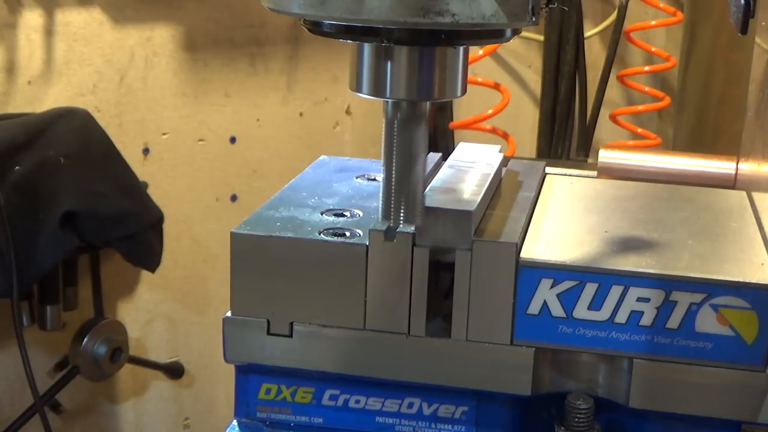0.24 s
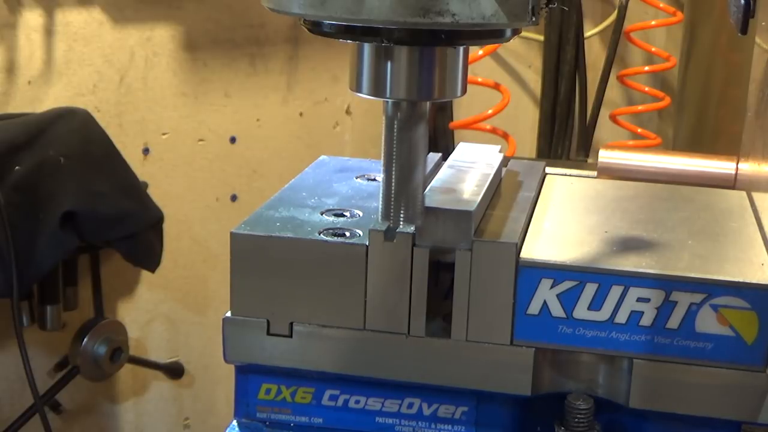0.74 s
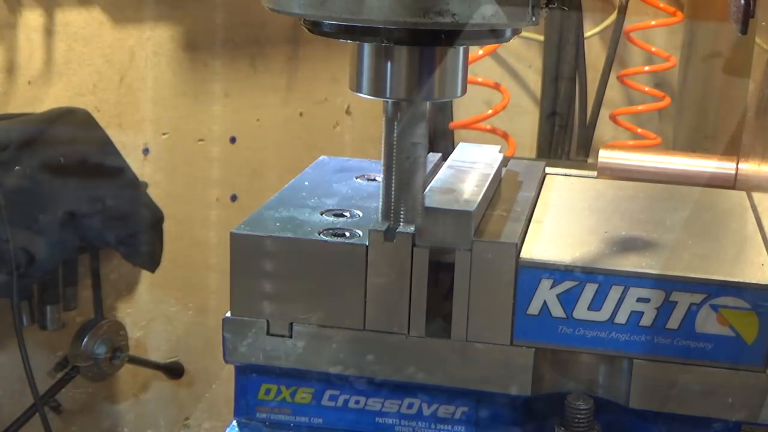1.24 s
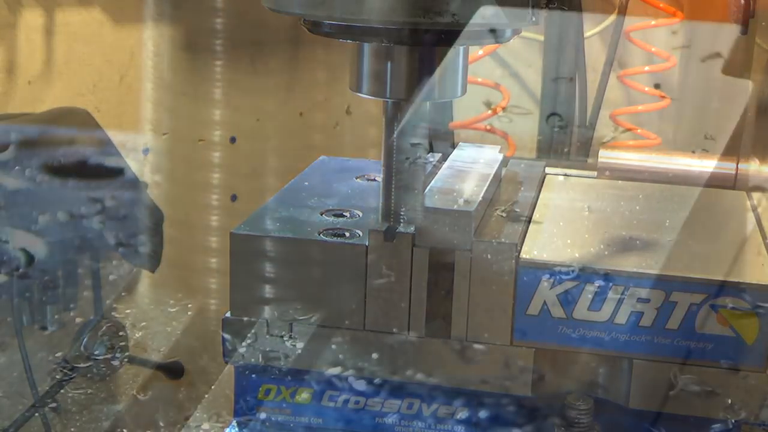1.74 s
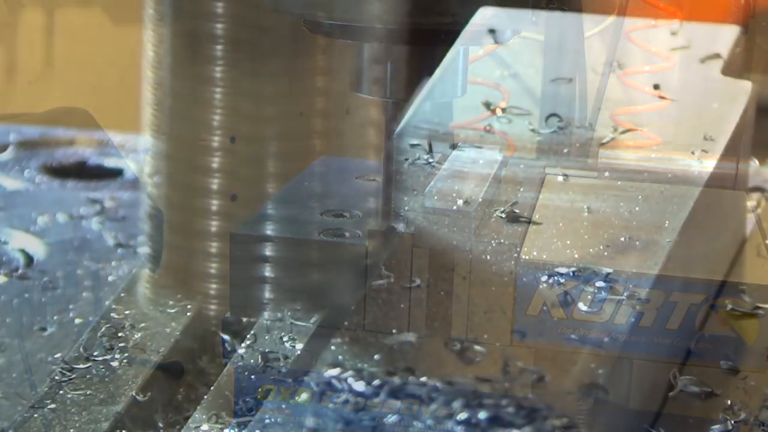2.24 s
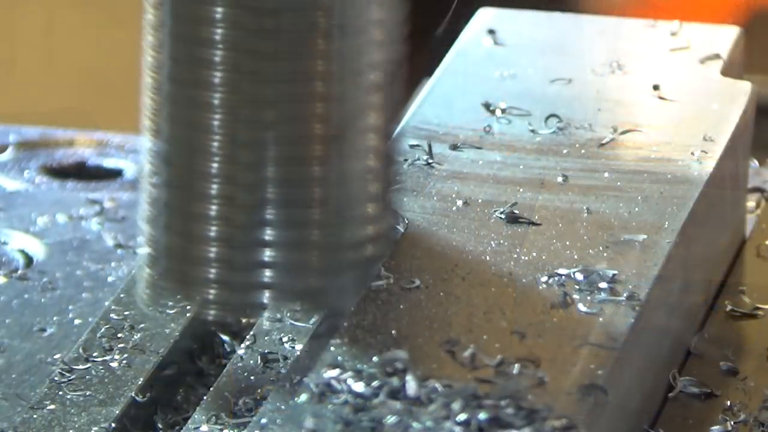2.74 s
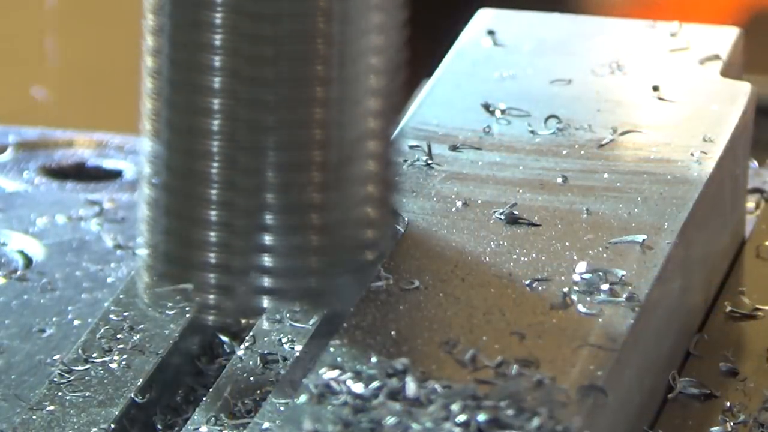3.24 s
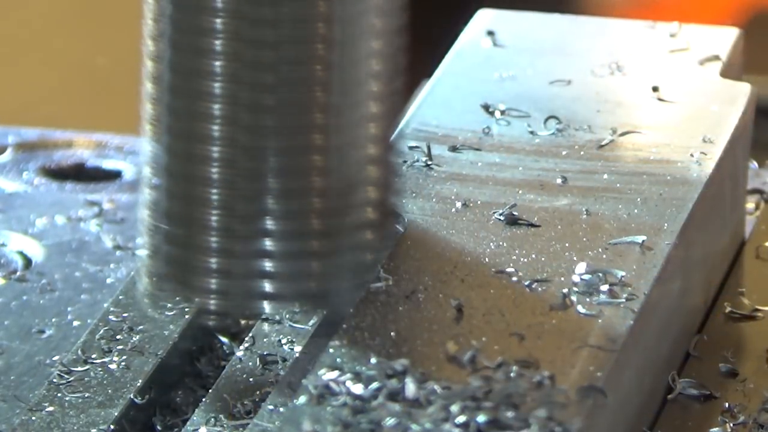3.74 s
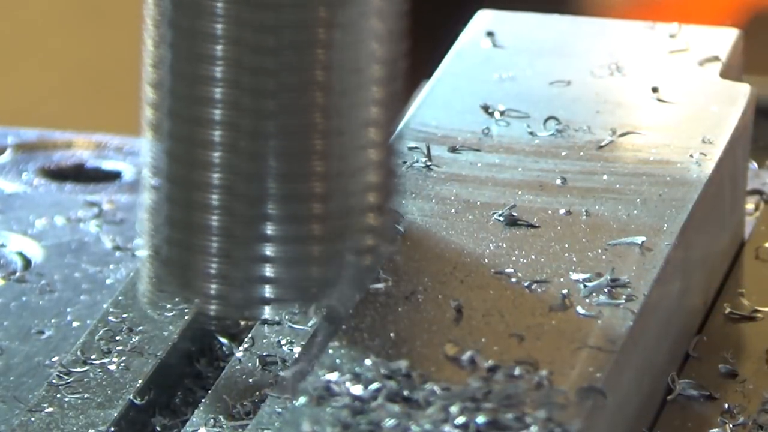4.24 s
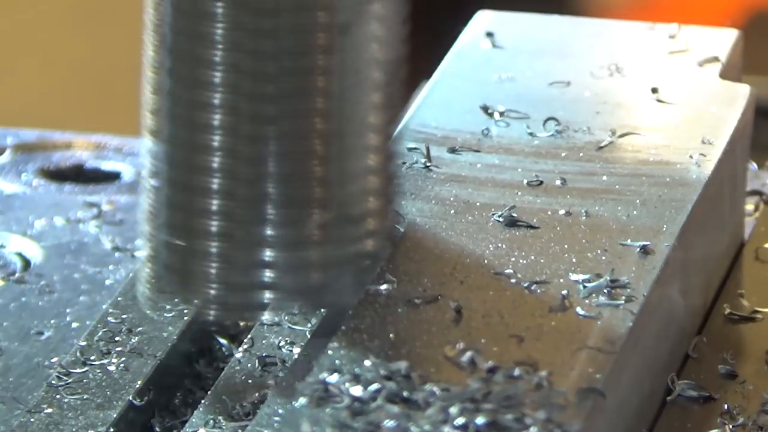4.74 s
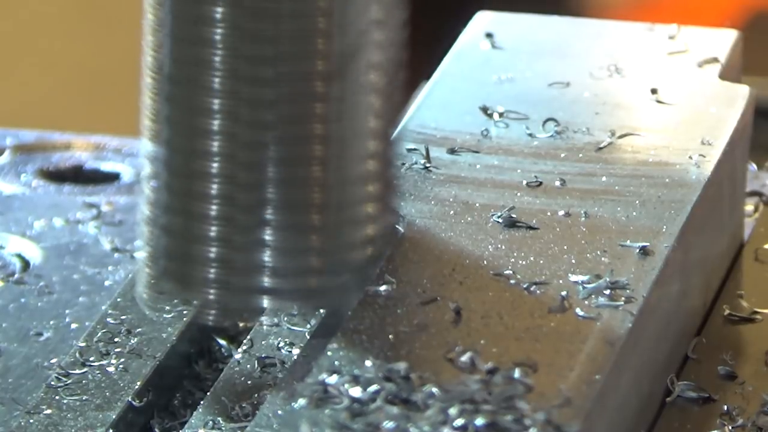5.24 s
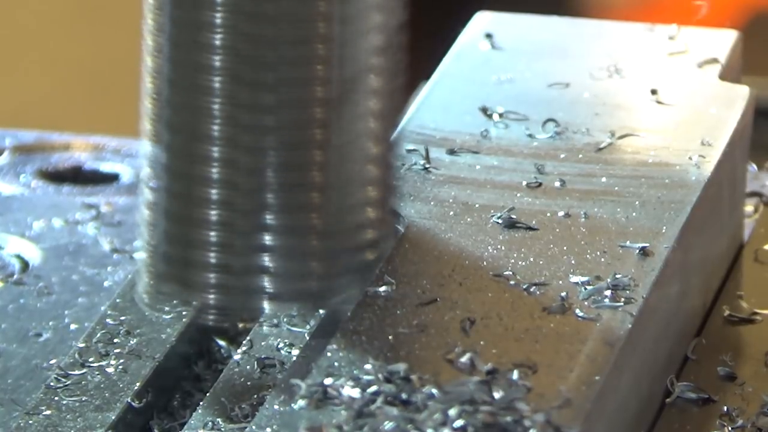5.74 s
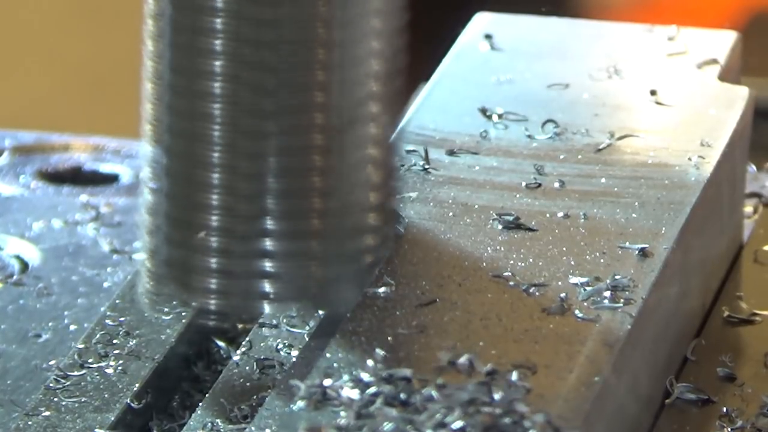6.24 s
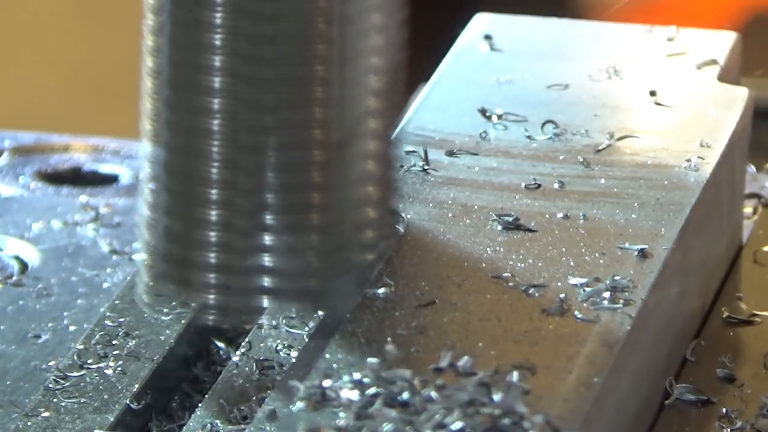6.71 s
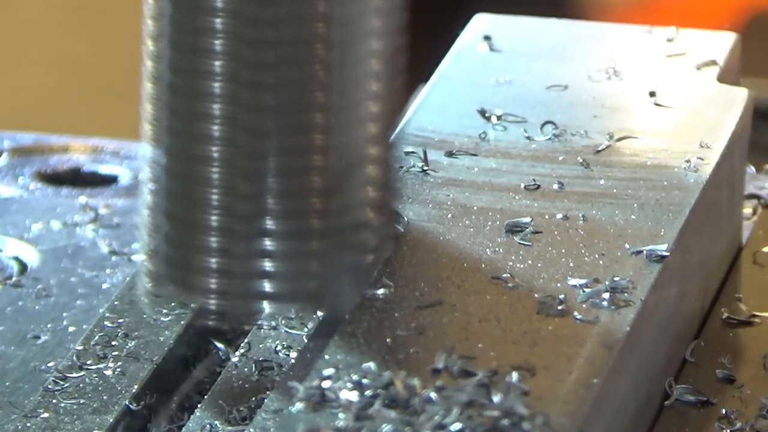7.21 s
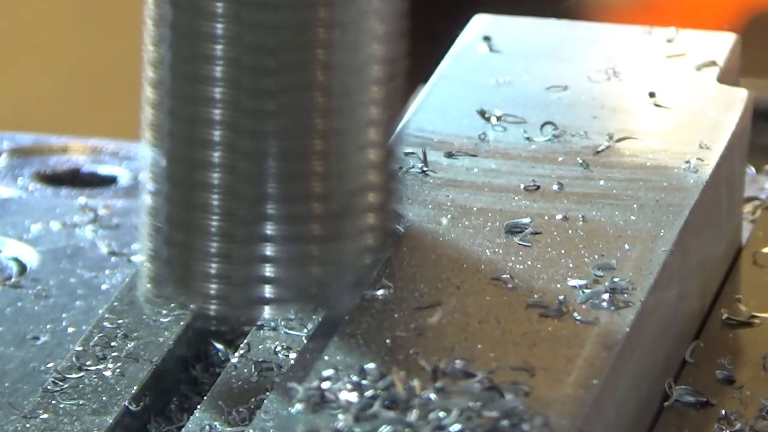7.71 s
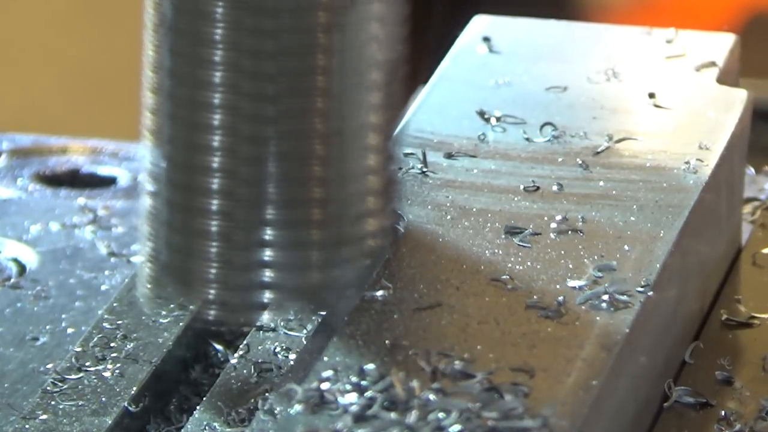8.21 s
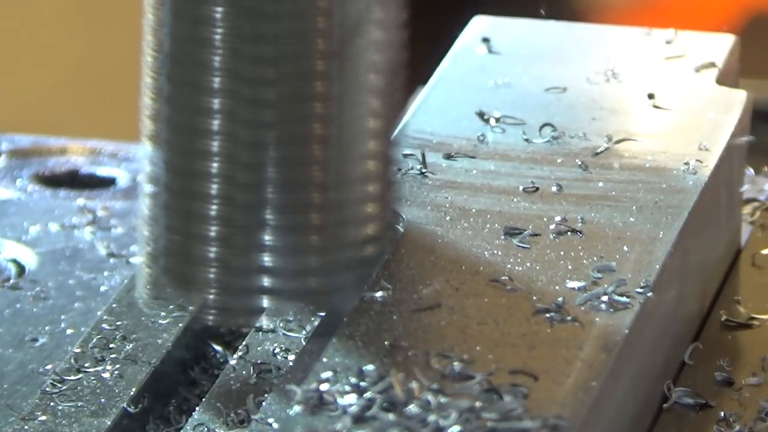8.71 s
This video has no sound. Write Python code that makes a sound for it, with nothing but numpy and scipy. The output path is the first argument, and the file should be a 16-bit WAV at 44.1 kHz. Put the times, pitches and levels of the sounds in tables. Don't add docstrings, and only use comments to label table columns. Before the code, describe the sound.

From 0 s a milling machine is already running close by in a workshop, its spindle making a loud, nasal gear whine around 1 kHz, with slow beats that swell and dip a little over once a second. Beneath are motor hum, belt tones and broad rumble; the cutter only skims the steel, giving a thin, uneven scratchy flutter. From about 0.9 to 1.8 s it sinks in: metallic ringing around 3 to 5 kHz grows fuller and the rumble rises. By 2.6 s the cut is at full depth. The whine becomes weaker and steadier, surrounded by denser gear buzz. Until 9 s the roar continues without pause, nearly sixty bites a second, alternating stronger and weaker about fourteen times a second. Crisp chip hiss rides on top, with a thin squeal near 13 kHz that grows early, then gently swells every couple of seconds. Wide stereo, dry and close.

```python
import sys
import numpy as np
from scipy import signal
from scipy.fft import rfft, irfft, next_fast_len
from scipy.io import wavfile
from scipy.ndimage import uniform_filter1d, map_coordinates

SR = 44100
rng = np.random.default_rng(int(sys.argv[2]) if len(sys.argv) > 2 else 0)


def attenuation_scalar(level_db):
    decades = np.asarray(level_db, float) / 20
    return 10 ** decades


def bounce(signal):
    frames = np.transpose(np.atleast_2d(signal))
    limited = np.clip(frames, -1, 1)
    pcm = np.round(limited * 32767).astype(np.int16)
    wavfile.write(sys.argv[1], SR, pcm)


N = 395577
SPINDLE_HZ = 14.415

# time_s, depth [share of the deep cut, 0 light - 1 deep], #
FEED = [
    (0, 0.1, 0.17, 0.19),
    (.9, 0.07, 0.2, 0.18),
    (1.3, 0.53, 0.13, 0.24),
    (1.8, 0.87, 0.094, 0.22),
    (2.6, 0.99, 0.094, 0.237),
    (9, 0.99, 0.13, 0.23),
]


def feed(t):
    time_s, *columns = np.transpose(FEED)
    return [np.interp(t, time_s, column) for column in columns]


# order [multiple], shallow_db [rms],
# deep_db [rms]
STRONG_ORDERS = [(3, -62.6, -52.9), (4, -48.8, -51.6), (6, -55.6, -53.7), (7, -48.7, -70.0),
                 (8, -31.4, -32.9), (9, -33.7, -36.3), (12, -37.4, -56.8), (14, -46.1, -46.1),
                 (16, -48.7, -44.0), (19, -54.2, -44.9), (21, -50.0, -45.2), (22, -53.0, -42.6),
                 (23, -38.0, -37.5), (24, -43.0, -38.9), (25, -46.9, -47.1), (27, -47.7, -43.7),
                 (29, -44.5, -51.3), (35, -41.3, -38.5), (36, -50.0, -40.1), (37, -40.4, -42.6),
                 (38, -52.1, -46.1), (40, -70.0, -44.8), (41, -44.0, -38.1), (42, -70.0, -45.9),
                 (44, -70.0, -45.6), (45, -39.6, -42.3),
                 (46, -41.9, -40.1), (47, -45.5, -38.8), (48, -42.7, -35.1), (49, -37.1, -32.8),
               (50, -44.6, -39.2), (51, -41.2, -36.8), (52, -45.9, -36.2), (54, -51.1, -38.0),
               (55, -43.5, -36.6), (57, -35.1, -32.8), (58, -45.1, -40.0), (59, -42.8, -35.5),
               (60, -45.4, -37.6), (61, -38.5, -33.6), (65, -35.9, -41.2), (66, -32.8, -35.9),
               (68, -34.5, -36.3), (69, -20.9, -25.2), (70, -34.1, -34.4), (71, -34.0, -39.7),
               (72, -27.7, -34.2), (73, -24.2, -26.9), (74, -25.2, -34.3), (75, -37.9, -46.3),
               (76, -32.9, -37.2), (78, -31.1, -34.7), (80, -32.2, -33.0), (81, -29.8, -34.6),
               (83, -35.3, -37.9), (84, -35.0, -33.0),
                 (89, -46.6, -41.1), (90, -41.1, -44.6), (92, -47.0, -42.1), (96, -42.9, -43.1),
               (98, -49.1, -43.0), (99, -42.4, -38.0), (100, -51.7, -37.3), (103, -43.8, -37.1),
               (108, -62.1, -43.4), (109, -42.0, -50.8), (119, -44.7, -42.7), (120, -40.3, -39.7),
               (123, -42.4, -48.6), (132, -48.6, -47.9), (133, -48.5, -48.0), (135, -49.7, -47.5),
               (136, -44.0, -53.6), (137, -47.6, -49.0), (140, -47.4, -49.7), (144, -50.9, -47.6),
               (145, -47.7, -56.5), (146, -45.2, -44.9), (147, -44.1, -46.8), (148, -44.2, -49.4)]
# freq_hz, level_db [rms]
WEAK_ORDERS = [(20, -68), (60, -58), (300, -57.5), (450, -58.5), (700, -42), (830, -46), (910, -44),
               (1000, -47), (1200, -38.5), (1350, -48), (1700, -45.5), (2200, -53.5), (2700, -66.5),
               (3000, -82.5)]
WHINE_ORDERS = [69, 73, 74]


def spindle(t):
    size = 8192
    knots = np.arange(0, N / SR + .5, .125)
    order = np.arange(size // 2 + 1)
    hz = order * SPINDLE_HZ
    ends_db = along(WEAK_ORDERS, hz) + 3 * rng.standard_normal((2, len(order)))
    strong = np.transpose(STRONG_ORDERS)
    ends_db[:, np.int_(strong[0])] = strong[1:]
    depth = feed(knots)[0][:, None]
    strength = attenuation_scalar((1 - depth) * ends_db[0] + depth * ends_db[1]) + 0j
    strength[:, WHINE_ORDERS] = attenuation_scalar(0.47) * whine(knots)

    loose = .22 * np.clip(hz / 600, .1, 2) * ~np.isin(order, WHINE_ORDERS) + 0.038
    chance = rng.standard_normal((2, len(knots), len(order)))
    chance = uniform_filter1d(chance, size=2, axis=1) * np.sqrt(2)
    drift = (1 + loose * (chance[0] + 1j * chance[1])) / np.sqrt(1 + 2 * loose ** 2)
    orders = strength * np.exp(2j * np.pi * rng.random(len(order))) * drift

    lean = along(LEAN, hz) / 2 + 1.8 * (hz > 200) * rng.standard_normal(len(order))
    lead = 0.16 + .6 * np.clip(hz / 1000, 0, 1) * rng.standard_normal(len(order)) / 2
    lean[WHINE_ORDERS] = 3.4, 2.6, 1.2
    lead[WHINE_ORDERS] = -.08, -.15, .15
    left = attenuation_scalar(lean) * np.exp(1j * lead)
    right = attenuation_scalar(-lean) * np.exp(-1j * lead)
    both = np.abs(left + right) / 2

    place = [t / knots[1], (t * SPINDLE_HZ % 1) * size]
    turns = [irfft(orders * side / both, size) * size / np.sqrt(2) for side in (left, right)]
    return np.array([map_coordinates(turn, place, order=1, mode="nearest") for turn in turns])


# level_db [rms], neighbour_db [rms], beat_hz, first_null_s
LIGHT_BEAT = [(-22.5, -26, 0.74, 0.29), (-26.5, -28.5, 0.88, .01), (-25, -35, 0.92, .01)]
# load_start_s, level_db [rms], neighbour_db [rms], null_s
LOADED_BEAT = [(2.76, -25.5, -34.5, 3.46), (2.37, -28, -36, 2.78), (1.2, -38, -45, 3.37)]


def whine(t):
    loaded_beat_hz, settle_s = 0.724, 0.87
    t = t[:, None]
    light_db, near_db, beat_hz, null_s = np.transpose(LIGHT_BEAT)
    start_s, loaded_db, weak_db, later_s = np.transpose(LOADED_BEAT)
    load = np.clip((t - start_s) / settle_s, 0, 1)
    light = attenuation_scalar(light_db) - attenuation_scalar(near_db) * np.exp(2j * np.pi * beat_hz * (t - null_s))
    loaded = attenuation_scalar(loaded_db) - attenuation_scalar(weak_db) * np.exp(2j * np.pi * loaded_beat_hz * (t - later_s))
    return (1 - load) * light + load * loaded


# shallow_db, deep_db, squeal_shallow_db, squeal_deep_db
FLUTES = [(1.5, 1.5, 7, -1), (1, 4, 0, -2), (-1, 1.5, 3, -5), (-4.5, -6.5, -5, -8)]


def contact(t):
    edge = .015
    depth, start, arc = feed(t)
    passes = 4 * (t * SPINDLE_HZ - start + 1)
    flute = np.int_(passes)
    angle = (passes - flute) / 4
    load = np.transpose(FLUTES)[:, flute % 4]
    chance_db = .7 * rng.standard_normal((2, N // 256))[:, flute]
    gain = attenuation_scalar(load[::2] + depth * (load[1::2] - load[::2]) + chance_db)
    thinning = np.clip((arc - angle) / (edge + 0.11 * (1 - depth)), 0, 1)
    shear = np.clip(angle / edge, 0, 1) * thinning
    shear = np.maximum(shear, 0.81 * depth)
    bite = np.exp(-((angle - .028) / .013) ** 2)
    snap = depth * np.exp(-((angle - arc + 0.025) / 0.023) ** 2)
    return gain[:, None] * [shear, bite, snap]


def cut(t, force):
    depth = feed(t)[0]
    loose = .2 + .16 * depth
    shear_db = -34.5 + 0.73 * depth
    chips = attenuation_scalar(2.5) * shear_hiss(depth, force[0], loose) + ringing_steel(depth, force[0], loose)
    return attenuation_scalar(shear_db) * chips + squeal(t, depth, force[1])


# freq_hz, level_db
CHIP = [(800, -58), (2000, -19), (3000, -20), (4500, -15.5), (7000, -21), (9000, -19), (11300, -23),
        (11700, -27.5), (13000, -27), (14000, -32), (14900, -35), (15300, -55), (16000, -70)]


def shear_hiss(depth, force, loose):
    shear, bite, snap = force
    drive = shear + (.9 - 1.2 * depth) * bite + 0.86 * snap + loose
    return unit(spread(drive * grit(900, spiky_db=1.5), lambda hz: attenuation_scalar(along(CHIP, hz))))


# freq_hz, width_hz, level_db
STEEL = [(2610, 70, -17), (3337, 134, -7.5), (3890, 150, -7), (4146, 74, 4), (4340, 170, -2.5),
         (4500, 29, 2.5), (4770, 56, -4.5), (5080, 210, -7), (5430, 89, -7), (5820, 120, -16),
         (6560, 470, -24), (8320, 580, -15.5), (10400, 140, -27)]
# freq_hz, width_hz, level_db
CORNER = [(3210, 160, -2), (4140, 330, -1), (4660, 190, -0.5), (5050, 220, -6), (8700, 1100, -13.5)]


def ringing_steel(depth, force, loose):
    shear, bite, snap = force
    blows = .45 * shear + .7 * bite + 1.3 * snap + .8 * loose
    steel = unit(spread(blows * grit(500, spiky_db=1.9), modes(STEEL)))
    light_blows = (1 - depth) * (blows + 0.22 * shear)
    corner = unit(spread(light_blows * grit(500, spiky_db=0.0), modes(CORNER)))
    return attenuation_scalar(4.5) * (.5 + .5 * depth) * steel + attenuation_scalar(-6) * (1 - depth) * corner


# freq_hz, width_hz, level_db
SQUEAL = [(13390, 240, 0), (13800, 350, -10)]


def squeal(t, depth, force):
    heat_s, surge_s, surge_peak_s = 2.3, 2.3, 2.8
    rub, catch, release = force
    heat = np.clip(t / heat_s, 0, 1)
    surge = np.cos(2 * np.pi * (t - surge_peak_s) / surge_s)
    level_db = -44 + 5.6 * heat + 0.8 * depth * surge
    drive = rub + .5 * catch + .6 * release + 0.092
    tone = spread(drive * grit(250, spiky_db=1.5), lambda hz: modes(SQUEAL)(hz) ** 2)
    return attenuation_scalar(level_db) * unit(tone)


def grit(rate, spiky_db):
    size = attenuation_scalar(spiky_db * wobble(rate))
    return size * rng.standard_normal((2, N))


# freq_hz, level_db [rms]
MOTOR = [(91.7, -62), (148.3, -41.5), (178.8, -41), (239.9, -36), (268.1, -43), (536.0, -40), (599.9, -47),
         (741.8, -33), (2039.2, -46.5), (2239.5, -66), (2383.2, -44), (2530.1, -53.8)]


def motor(t):
    idle_db = 3 * (1 - feed(t)[0])
    tones = np.zeros(N)
    for hz, db in MOTOR:
        level_db = db - idle_db * (hz > 400) + 2.5 * wobble(2.96)
        phase = 2 * np.pi * (hz * t + rng.random()) + 0.17 * wobble(2.06)
        tones += attenuation_scalar(level_db) * np.sin(phase)
    return np.sqrt(2) * filtered(tones, sides)


# freq_hz, level_db [per Hz]
DRONE = [(15, -72), (28, -68.5), (100, -55.5), (200, -57.5), (330, -51.5), (450, -63.5), (560, -56),
         (700, -47), (830, -54), (930, -49.5), (1200, -47.5), (1440, -56), (2000, -60), (2800, -66),
         (6000, -75), (15000, -109)]
# freq_hz, width_hz, level_db
CASTING = [(1452, 27, -1.5), (1720, 28, -3.5), (2108, 33, -8), (2407, 140, -19.5)]


def drone(t, force):
    depth = feed(t)[0]
    shear, bite, snap = force[0]
    rumble = (1 + 0.17 * shear) * rng.standard_normal((2, N))
    body = spread(rumble, lambda hz: attenuation_scalar(along(DRONE, hz)))
    ring = spread((0.4 + 1.3 * shear + .5 * snap) * grit(200, spiky_db=4.0), modes(CASTING))
    swell = attenuation_scalar(-4 * (1 - depth) + 0.19 * wobble(1.72) + 1.0 * wobble(9))
    return swell * (attenuation_scalar(-19.5) * unit(body) + attenuation_scalar(-29.5) * unit(ring))


# freq_hz, width_hz, depth [0-1]
NOTCHES = [(615, 20, .4), (915, 70, .6), (1355, 40, .5), (1985, 40, .45), (2190, 80, .45), (2270, 30, .4),
           (2340, 30, .4), (2450, 40, .4), (2980, 200, .4), (3510, 50, .35), (4385, 50, .7),
           (4715, 50, .55), (4890, 100, .45), (5660, 120, .3), (6330, 250, .4), (6900, 150, .3),
           (7830, 100, .3), (9350, 70, .3)]


def reflections(hz):
    return np.prod([1 - d * w * w / (w * w + 4 * (hz - c) ** 2) for c, w, d in NOTCHES], axis=0)


# freq_hz, level_db
LEAN = [(60, 1.0), (110, 0.5), (200, 0.0), (380, 2.0), (690, 4.0), (1280, 4.5), (2350, 2.5), (4330, 1.0),
        (7980, 0.0), (14700, 0.0)]


def sides(hz):
    return attenuation_scalar(along(LEAN, hz) * [[.5], [-.5]])


# freq_hz, coherence [0-1]
ALIKE = [(60, 1), (130, 0.75), (290, 0.22), (630, 0.56), (1390, 0.52), (3050, 0.88), (6700, 0.91),
         (14700, 1)]


def spread(pair, response):
    m = next_fast_len(N + SR // 4)
    hz = np.fft.rfftfreq(m, 1 / SR)
    turn = np.arccos(np.clip(along(ALIKE, hz), 0, 1)) / 2
    mid, side = rfft(pair, m) * response(hz) * [np.cos(turn), np.sin(turn)]
    return irfft([mid + side, mid - side] * sides(hz), m)[:, :N]


def modes(rows):
    def response(hz):
        total = 0
        for k, (c, w, db) in enumerate(rows):
            total = total + (-1) ** k * attenuation_scalar(db) * 1j * hz * w / (c * c - hz * hz + 1j * hz * w)
        return total
    return response


def filtered(x, response):
    m = next_fast_len(N + SR // 2)
    return irfft(rfft(x, m) * response(np.fft.rfftfreq(m, 1 / SR)), m)[..., :N]


def wobble(rate):
    coarse = np.arange(0, N + 16, 16)
    knots = rng.standard_normal(int(N * rate / SR) + 4)
    return np.interp(np.arange(N), coarse, map_coordinates(knots, [coarse * rate / SR]))


def along(points, hz):
    f, v = np.transpose(points)
    return np.interp(np.log(hz + 1), np.log(f + 1), v)


def unit(x):
    return x / np.sqrt(np.mean(x ** 2) + 1e-20)


def scene():
    t = np.arange(N) / SR
    force = contact(t)
    return spindle(t) + motor(t) + filtered(cut(t, force) + drone(t, force), reflections)


def low_pass(x):
    return signal.sosfilt(signal.butter(12, 15310, fs=SR, output="sos"), x)


def record(dry):
    ceiling, knee = 0.97, 7
    held = dry / (1 + np.abs(dry / ceiling) ** knee) ** (1 / knee)
    return low_pass(held)


dry = scene()
out = record(dry)
bounce(out)
```